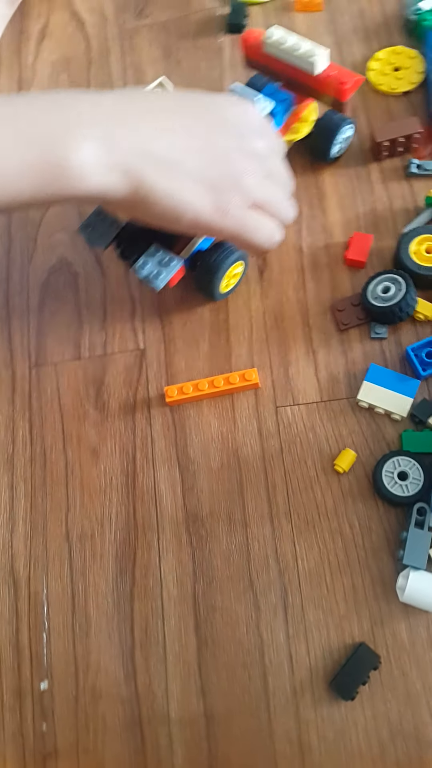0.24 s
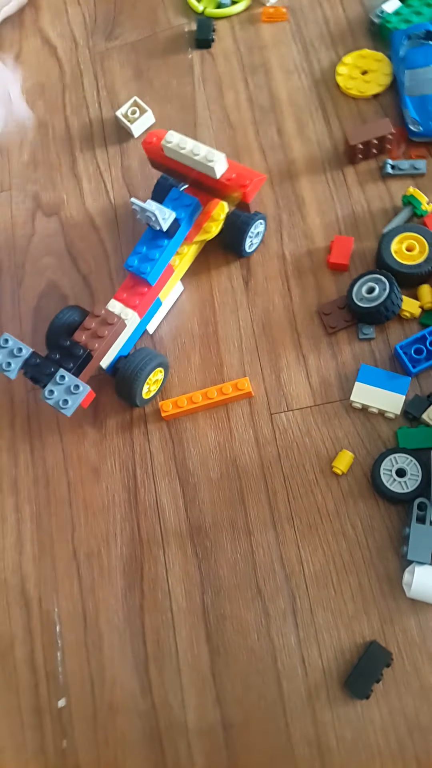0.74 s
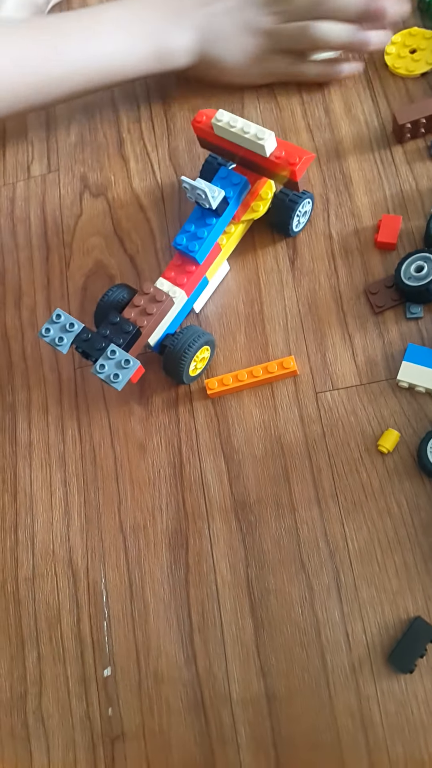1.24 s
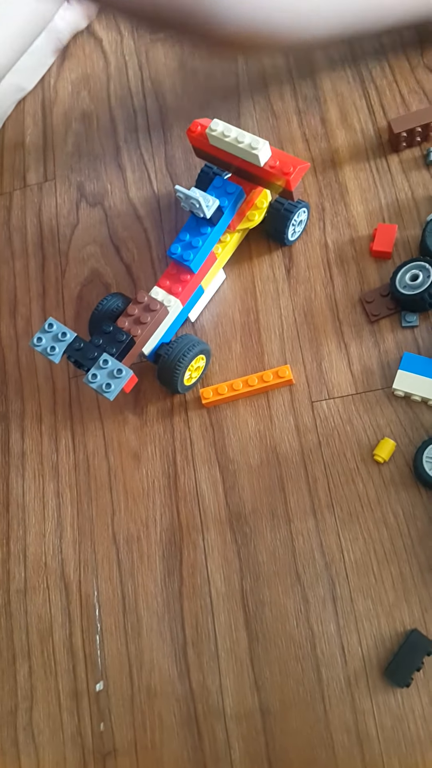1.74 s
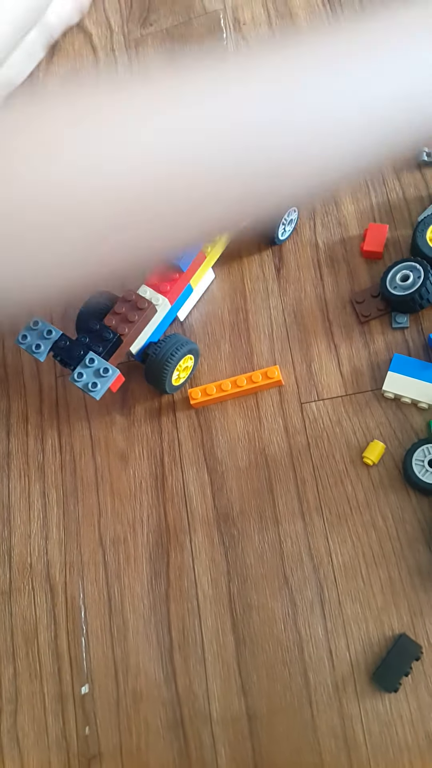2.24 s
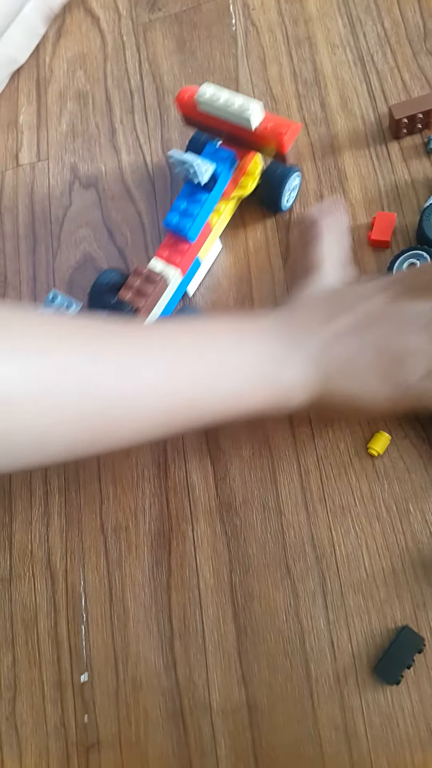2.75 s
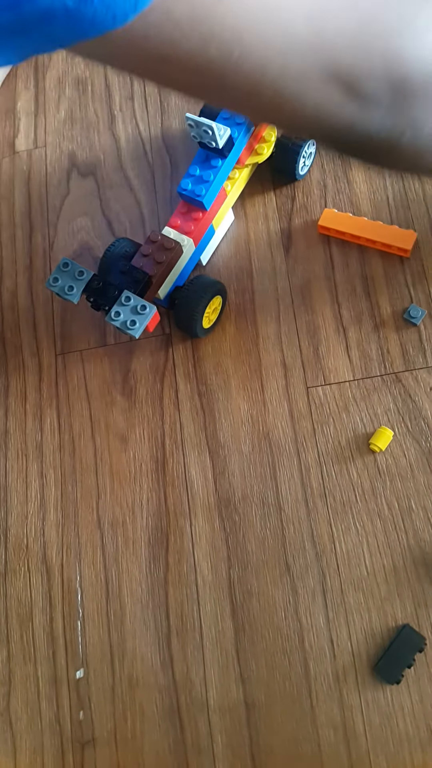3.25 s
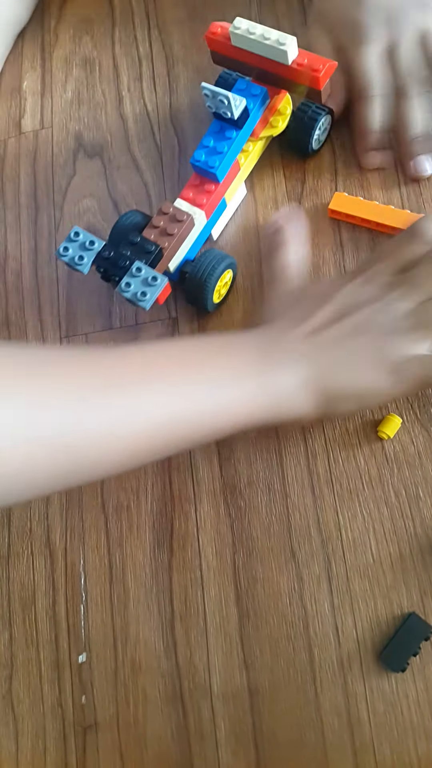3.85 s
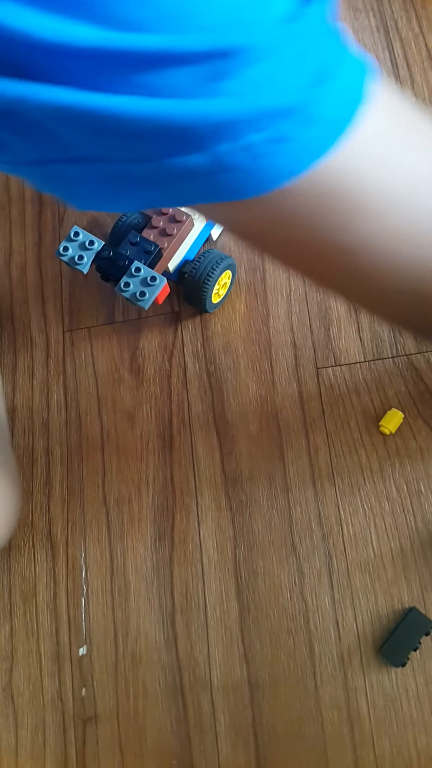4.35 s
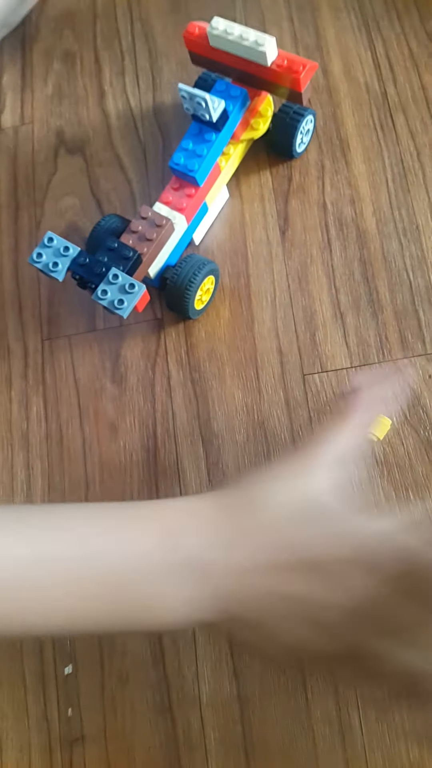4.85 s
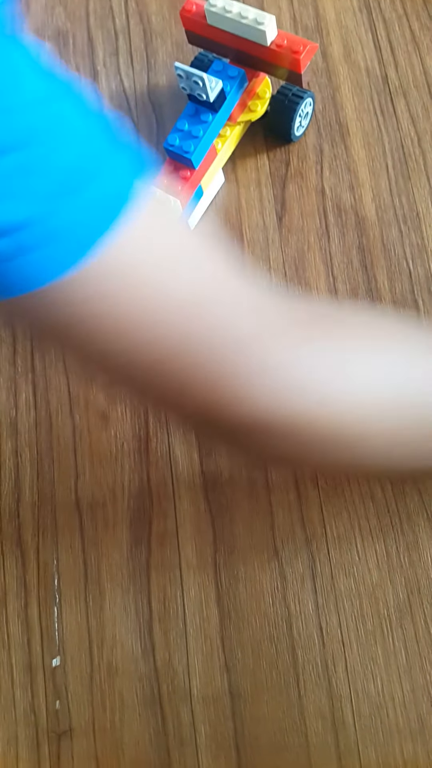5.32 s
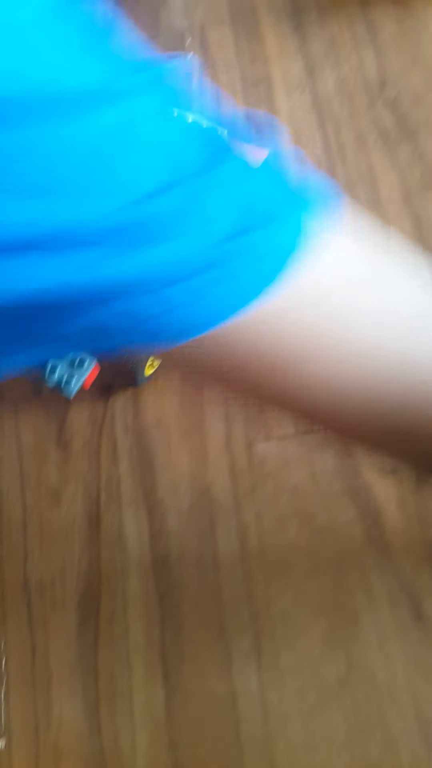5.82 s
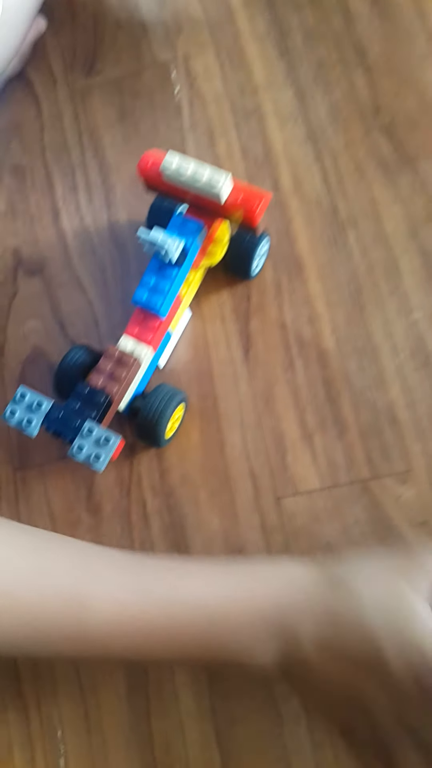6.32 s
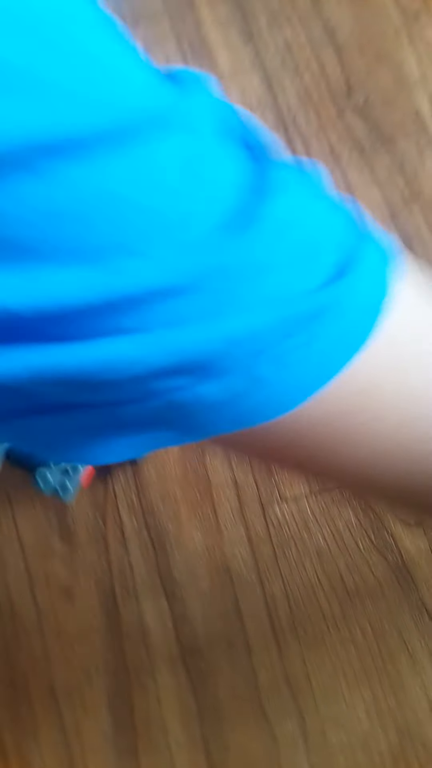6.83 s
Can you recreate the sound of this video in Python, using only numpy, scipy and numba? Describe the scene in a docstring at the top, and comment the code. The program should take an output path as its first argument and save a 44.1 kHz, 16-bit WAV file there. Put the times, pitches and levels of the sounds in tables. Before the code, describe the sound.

A hand lightly brushes loose plastic bricks and toy wheels on a wooden floor, with a few small knocks. Then it sweeps them aside five times, each a bright burst of clattering and scraping over the drumming boards. Stray clicks and softer sliding fall between the sweeps. A fan hums faintly throughout, and the microphone is close, in a small room.

```python
"""A fan motor hums throughout, close to a phone with two microphone ports. A hand first brushes loose
plastic bricks and toy wheels on a wooden floor, with a few light knocks. From 1.35 s it sweeps them along
five times: collisions excite the modes of the hollow pieces, edges skid on the varnish, the boards drum
and dragged pieces ring on. Stray knocks fall between the sweeps, and the floor gives four soft, deep
swells, as under a shifting knee. The last sweep ends near 7.1 s."""
import sys
import numpy as np
from scipy import signal
from scipy.fft import rfft, irfft, next_fast_len
from scipy.io import wavfile
from scipy.ndimage import uniform_filter1d
from numba import njit

SR = 44100
rng = np.random.default_rng(int(sys.argv[2]) if len(sys.argv) > 2 else 0)


def bounce(signal):
    """Save signal as a 16-bit WAV file at the path given by the first command-line argument."""
    frames = np.transpose(np.atleast_2d(signal))
    limited = np.clip(frames, -1, 1)
    pcm = np.round(limited * 32767).astype(np.int16)
    wavfile.write(sys.argv[1], SR, pcm)


N = 312228
PORT_LAG = 11  # samples by which the right port hears later

# normal modes of the hollow bricks: f/Hz, spread/Hz, relative level/dB
BRICK_MODES = [(2184, 300, -12.5), (3480, 640, -7.5), (4007, 396, -4), (5000, 140, -6.5), (5750, 233, -4.5),
               (6720, 340, -4), (8140, 110, -10.5), (8600, 646, -4.5), (10560, 680, -5.5),
               (10980, 1000, -10), (12380, 350, -10), (14550, 510, -14.5)]


def undb(db):
    """Amplitude ratio of a level in decibels."""
    return 10 ** (np.asarray(db) / 20)


def level(x, db):
    """Scaling to a given RMS level."""
    return x * undb(db) / np.sqrt(np.mean(x ** 2))


def colour(x, points):
    """Spectral shaping by points (f/Hz, gain/dB) joined on a log-frequency axis."""
    hz, db = np.transpose(points)
    size = next_fast_len(N)
    log_hz = np.log(np.arange(size // 2 + 1) * SR / size + 1)
    return irfft(rfft(x, size) * undb(np.interp(log_hz, np.log(hz), db)), size)[..., :N]


def two_bands(x, split_hz, low_db, high_db):
    """Crossover: complementary bands, each with its own gain."""
    low = colour(x, [(split_hz, 0), (1.2 * split_hz, -30)])
    return low * undb(low_db) + (x - low) * undb(high_db)


def resonate(x, modes):
    """Superposition of two-pole resonances (f/Hz, bandwidth/Hz, gain/dB)."""
    return sum(undb(db) * signal.lfilter(*signal.iirpeak(hz, hz / width, SR), x)
               for hz, width, db in modes)


def walk(rate_hz):
    """Slow random modulation: held values, smoothed twice, with a spread near 1."""
    hold = int(SR / rate_hz)
    steps = np.repeat(rng.standard_normal(N // hold + 1), hold)
    return 1.3 * uniform_filter1d(uniform_filter1d(steps, hold), hold)[:N]


def ports(x, other, coherent_hz):
    """Partial coherence: the right port hears x later, giving way to an unrelated sound in the treble."""
    hz = np.arange(len(x) // 2 + 1) * SR / len(x)
    coherence = 1 / (1 + (hz / coherent_hz) ** 2.7)
    right = coherence * rfft(np.roll(x, PORT_LAG)) + np.sqrt(1 - coherence ** 2) * rfft(other)
    return np.array([x, irfft(right, len(x))])


@njit
def damped_sines(size, start, hz, t60, gain, lag):
    """Free vibration: each mode decays exponentially, with its own gain and arrival at each port."""
    out = np.zeros((2, size + 8192))
    for mode in range(len(start)):
        pole = np.exp(2j * np.pi * hz[mode] / SR - np.log(1000) / (t60[mode] * SR))
        phasor = 1 + 0j
        for i in range(min(int(t60[mode] * SR), 8000)):
            phasor *= pole
            out[0, start[mode] + i] += gain[0, mode] * phasor.imag
            out[1, start[mode] + lag[mode] + i] += gain[1, mode] * phasor.imag
    return out[:, :size]


def strike(start, db, pan_db, hz, t60, lag):
    """Impulse excitation of one mode per entry; start and lag are in samples, t60 in seconds."""
    gain = undb(db + np.array([pan_db, -pan_db]) / 2)
    lag = np.clip(lag, 0, 60).astype(np.int64)
    return damped_sines(N, start.astype(np.int64), np.clip(hz, 50, .45 * SR), t60, gain, lag)


def fan_hum(fundamental_hz=67.74):
    """Harmonic series: motor partials waver together in pitch, singly in level, over rushing air."""
    # motor partials: harmonic number, level/dB, left minus right/dB
    partials = [(2, -48, -1), (3, -46.5, 4.5), (4, -52, -2), (5, -56, -7), (6, -57.5, -11)]
    # spectrum of the air: f/Hz, relative density level/dB
    air_spectrum = [(20, -35.5), (60, -22.5), (98, -12.5), (126, 0.5), (159, -5), (197, 3), (235, -4.5),
                    (275, -5.5), (420, -12), (1400, -19), (3000, -26), (5000, -34), (7500, -44.5),
                    (16000, -45.5)]
    phase = 2 * np.pi * np.cumsum(fundamental_hz * (1 + 0.01002 * walk(2.2))) / SR
    motor = sum(undb(db + 1.47 * walk(14) + np.array([[pan_db], [-pan_db]]) / 2) * np.sin(k * phase)
                for k, db, pan_db in partials)
    air = colour(ports(*rng.standard_normal((2, N)), coherent_hz=1140), air_spectrum)
    return np.array([motor[0], np.roll(motor[1], PORT_LAG)]) + level(air, -43)


def hand_levels(still_db=-83, fade_db=29.5):
    """Incoherent sources add as powers: sweeps and brushes set clatter, skid, drum, grit and top in dB."""
    # light brushes of the hand: t/s, rise/s, fall/s, clatter level/dB, sliding level/dB
    brushes = [(0.458, 0.11, 0.12, -48, -39), (.512, .03, 0.033, -47, -48), (.546, 0.14, 0.012, -56, -44),
               (1.148, 0.03, 0.027, -57, -46), (1.26, 0.25, 0.41, -63, -50.5),
               (2.19, 0.049, 0.086, -51, -41.5), (2.41, 0.077, 0.22, -55.5, -48),
               (3.95, 0.11, 0.16, -57, -47), (4.88, 0.11, 0.18, -45.5, -42.5),
               (5.09, 0.024, 0.08, -60, -43), (5.17, 0.13, 0.22, -56, -38), (5.226, 0.017, 0.018, -33, -25),
               (6.0, 0.11, 0.18, -49, -50), (6.13, 0.21, 0.41, -47, -41), (6.32, 0.2, 0.077, -76, -46),
               (6.682, 0.26, 0.18, -47.5, -45)]
    # five sweeps, one envelope each: t/s, clatter level/dB, sliding level/dB
    sweeps = [
        [(1.35, -72, -51), (1.36, -39.5, -46), (1.386, -26, -43), (1.44, -33, -40.5), (1.56, -36, -38),
         (1.62, -30, -36.5), (1.73, -29, -33.5), (1.784, -24, -33.5), (1.814, -24.5, -35), (1.98, -32, -34.5),
         (2.098, -48.5, -47.5), (2.16, -77, -44)],
        [(2.71, -61, -63), (2.728, -49, -38), (2.77, -22, -38.5), (2.872, -28.5, -33), (2.94, -27.5, -33.5),
         (2.985, -27.5, -29), (3.03, -20, -36.5), (3.075, -23.5, -28.5), (3.12, -21.5, -29.5),
         (3.165, -25, -33.5), (3.222, -24, -32), (3.468, -43.5, -41.5), (3.516, -40, -42), (3.7, -68, -64)],
        [(4.0, -63.5, -56), (4.168, -40.5, -29), (4.2, -27.5, -36.5), (4.21, -38, -37), (4.245, -29.5, -32.5),
         (4.27, -26, -31), (4.33, -23.5, -36), (4.36, -23.5, -32.5), (4.39, -26.5, -33.5), (4.44, -29.5, -32.5),
         (4.59, -36.5, -35.5), (4.758, -61, -56), (4.77, -52, -50)],
        [(5.238, -38, -34), (5.294, -46, -35), (5.346, -28, -32), (5.37, -35, -32.5), (5.524, -46.5, -36.5),
         (5.534, -43, -39.5), (5.67, -31, -33.5), (5.734, -40, -36.5), (5.91, -73, -63.5)],
        [(6.699, -55, -41), (6.705, -33, -39), (6.72, -33, -47), (6.727, -36, -40), (6.745, -27, -40),
         (6.754, -22, -36), (6.76, -21.5, -33), (6.8, -17.5, -33.5), (6.828, -22, -27), (6.84, -23, -29.5),
         (6.894, -29.5, -35), (6.98, -27, -30), (7.074, -42, -40), (7.08, -42, -49)],
    ]
    # offsets for each sweep's heap: skid/dB, drumming/dB, grit over skid/dB, top of the clatter/dB
    heaps = [(-2.5, 2, 3.5, -3), (0.6, 2, -1.9, -0.5), (1.8, -1, -0.9, -2), (3.5, -0.5, -8.5, -0.5),
             (0, 0.5, -4, 0.5)]
    t = np.arange(N) / SR
    power = np.full((5, N), undb(2 * still_db))
    for sweep, (skid_db, drum_db, grit_db, top_db) in zip(sweeps, heaps):
        times, clatter_db, slide_db = np.transpose(sweep)
        rows = (clatter_db, slide_db + skid_db, slide_db + drum_db,
                slide_db + skid_db + grit_db, clatter_db + top_db)
        power += undb([2 * np.interp(t, times, row, left=-200, right=-200) for row in rows])
    for peak_s, rise, fall, clatter_db, slide_db in brushes:
        away = np.maximum((peak_s - t) / rise, (t - peak_s) / fall)
        rows = np.array([[clatter_db], [slide_db], [slide_db], [slide_db], [clatter_db]])
        power += undb(2 * (rows - fade_db * np.minimum(away, 10)))
    return 10 * np.log10(power)


def clatter(body_db, top_db, collisions=26000, modes_each=3):
    """Modal ringing: thousands of small collisions, in louder and softer bunches, excite brick modes."""
    when, force = np.repeat(rng.random((collisions, 2)), modes_each, axis=0).T
    pan, lag = np.repeat(rng.standard_normal((collisions, 2)), modes_each, axis=0).T
    mode, sustain, detune, soft = rng.random((collisions * modes_each, 4)).T
    hz, spread, mode_db = np.array(BRICK_MODES)[(mode * len(BRICK_MODES)).astype(int)].T
    start = (when * N).astype(int)
    force_db = 2 * np.minimum(-np.log(1 - force), 4)  # most collisions are soft
    bunch_db = walk(65)[start]
    db = mode_db + force_db + bunch_db - 5.1 * soft
    hz = hz + 1.506 * spread * (2 * detune - 1)
    t60 = 0.0093 * 3.04 ** (2 * sustain - 1)
    ringing = level(strike(start, db, 4.5 * pan, hz, t60, PORT_LAG + 8 * lag), 0)
    return two_bands(ringing, split_hz=9000, low_db=body_db, high_db=top_db)


def slips(density, spread_db):
    """Shot noise of friction: sparse impulses of uneven size."""
    impulses = (rng.random(N) < density) * rng.standard_normal(N)
    return impulses * undb(spread_db * np.minimum(rng.exponential(size=N), 4))


def skid(rub_db, grit_db):
    """Sliding friction: edges slip over the grain of the varnish, a hollow rub below and grit above."""
    # spectrum of the friction: f/Hz, relative density level/dB
    spectrum = [(410, 5.5), (700, 6.5), (1330, 11.5), (1460, 11.5), (3500, 5), (6740, -16), (7490, -45),
                (8420, -33), (11400, -13), (16000, -19)]
    patchy = undb(2.73 * walk(45))
    friction = ports(slips(.3, 0.99) * patchy, slips(.3, 3.7) * patchy, coherent_hz=2310)
    friction = level(colour(friction, spectrum), 0)
    return two_bands(friction, split_hz=2050, low_db=rub_db, high_db=grit_db)


def boards(drum_db):
    """Forced vibration: the sliding pieces drive the resonances of the floor."""
    # modes of the boards: f/Hz, bandwidth/Hz, relative gain/dB
    modes = [(254, 57, 14), (302, 70, 16.5), (370, 84, 12.5), (419, 46, -2), (670, 350, 9.5),
             (744, 88, 3.5), (1230, 120, -3)]
    patchy = undb(walk(30))
    force = ports(patchy * slips(.2, 0.94), patchy * slips(0.16, 0.79), coherent_hz=1190)
    return level(resonate(force, modes), 0) * undb(drum_db)


def knocks(parts=24):
    """Impact transients: a crack, a woody tap, a hand-damped thud, the piece's ring and a short rattle."""
    # single knocks: t/s, level/dB, ring f/Hz, weight on the boards relative to that level/dB
    blows = [(.4501, -40, 2500, -10), (0.51, -37, 2300, -4), (1.147, -39, 2400, 4),
             (1.3607, -23.5, 3300, -9), (1.3858, -17, 6700, -29), (1.378, -18.5, 4050, -19),
             (1.401, -13.5, 4860, -12), (1.475, -17, 3860, -14), (1.511, -17, 3360, -12),
             (1.55, -20, 6960, -12), (1.568, -12, 4450, -13), (1.6086, -21, 4400, -7),
             (1.632, -29, 12900, -17), (1.6631, -20, 10800, -18), (1.688, -15, 11100, -14),
             (1.735, -24, 3300, -10), (1.7443, -15.5, 9390, -25), (1.761, -14.5, 3900, -13),
             (1.805, -16, 4520, -22), (1.8556, -25, 11600, -20), (1.929, -33, 12500, -28),
             (1.946, -22, 8600, -31), (1.974, -25, 11000, -22), (1.983, -25.5, 11100, -34),
             (1.991, -16.5, 8740, -24), (2.0428, -28.5, 10300, -25), (2.184, -32, 8600, -13),
             (2.195, -38, 6900, -20), (2.198, -43, 12000, -26), (2.273, -40, 2910, 13.5),
             (2.379, -21.5, 2470, 3), (2.3865, -32, 6500, -12), (2.4285, -42, 3660, 14),
             (2.5016, -33, 3620, 9.5), (2.7257, -22, 5730, -28), (2.735, -23, 3400, -16),
             (2.743, -19.5, 5600, -24), (2.7628, -13, 5770, -10), (2.77, -17.5, 6250, -23),
             (2.771, -19.5, 13200, -33), (2.79, -18, 5000, -24), (2.8094, -14.5, 6500, -20),
             (2.833, -16.5, 6330, -16), (2.848, -11.5, 10700, -8), (2.894, -14, 5700, -22),
             (2.957, -9.5, 9200, -22), (2.957, -19, 13000, -28), (2.9892, -9.5, 5100, -20),
             (2.991, -17, 12000, -26), (3.012, -16, 10300, -30), (3.018, -17, 6640, -28),
             (3.023, -14, 8800, -32), (3.025, -5.5, 6070, -24), (2.997, -12.5, 6560, -22),
             (3.039, -10, 6800, -18), (3.085, -13, 8700, -27), (3.099, -17, 4600, -20),
             (3.107, -20.5, 8600, -30), (3.123, -17.5, 11500, -26), (3.1743, -11.5, 4520, -29),
             (3.347, -34, 3750, -17), (3.374, -26.5, 11200, -34), (3.3755, -18.5, 4930, -14),
             (3.4247, -23.5, 11700, -18), (3.458, -36, 2400, 11), (3.481, -37.5, 2400, 18.5),
             (3.502, -23, 5000, -25), (3.509, -25, 5600, -29), (3.509, -31, 12000, -30),
             (3.516, -18.5, 5270, -19), (3.5496, -22, 2390, -2), (3.568, -38, 2400, 11),
             (3.577, -31.5, 6700, -17), (3.905, -21, 5560, -7), (3.975, -39, 3900, 14.5),
             (4.0966, -29.5, 3700, -21), (4.137, -25, 2350, -15), (4.159, -19, 3650, -10),
             (4.1892, -13, 8530, -20), (4.199, -16, 6500, -16), (4.236, -21, 5050, -20),
             (4.2506, -10, 7500, -14), (4.254, -13, 8600, -21), (4.297, -14.5, 5950, -10),
             (4.309, -19, 6960, -20), (4.324, -15.5, 8650, -20), (4.337, -13, 8400, -23),
             (4.342, -6, 6200, -25.5), (4.3697, -10, 6530, -20), (4.423, -15, 5580, -26),
             (4.565, -26, 8600, -30), (4.5828, -19, 5700, -26), (4.674, -37, 3300, -30),
             (4.688, -34, 8500, -20), (4.7718, -28, 5800, -19), (4.806, -41, 8600, -26),
             (4.8232, -29.5, 3660, -7), (4.844, -27, 2860, -1), (4.8435, -40, 12300, -28),
             (4.869, -31, 6500, -16), (4.875, -30, 7900, -20), (4.884, -29.5, 5600, -31),
             (4.894, -42, 13000, -30), (5.0111, -40.5, 2490, 12.5), (5.064, -34, 2500, 11),
             (5.0862, -33, 2570, 3), (5.1594, -24.5, 3030, -11), (5.172, -27, 6400, -22),
             (5.211, -22, 5960, -20), (5.2237, -9, 6000, -18), (5.2294, -11, 6100, -20),
             (5.272, -19.5, 3100, -4), (5.308, -25, 3160, -10), (5.3219, -11, 9560, -24),
             (5.3225, -20, 12600, -25), (5.3408, -13, 12400, -21), (5.4068, -15, 10400, -16),
             (5.4649, -22.5, 8500, -7), (5.535, -22, 6000, -10), (5.5656, -17.5, 11800, -19),
             (5.604, -22.5, 2380, -9), (5.688, -20, 5600, -15), (5.7165, -16.5, 5900, -22),
             (5.7908, -30, 3570, 0), (5.8893, -41, 2470, 14), (6.1135, -23, 3330, -8),
             (6.128, -22.5, 3200, -19), (6.178, -34, 1910, 0), (6.2144, -36.5, 2000, 8),
             (6.262, -38, 2000, 7), (6.2844, -43, 2590, 4), (6.308, -39, 2640, -13),
             (6.316, -44, 3000, -14), (6.548, -43.5, 2400, 23.5), (6.703, -16.5, 12000, -23),
             (6.715, -18, 7400, -33), (6.7175, -15, 12000, -22), (6.7339, -13.5, 7300, -26),
             (6.7398, -9.5, 11800, -29), (6.758, -11, 3530, -22), (6.761, -16, 5430, -26),
             (6.7758, -11.5, 3630, -18), (6.808, -12.5, 7800, -18), (6.822, -10.5, 5750, -18),
             (6.92, -18.5, 5870, -30), (6.921, -25, 8300, -30), (6.934, -18, 12300, -9),
             (6.976, -16, 5800, -19), (6.987, -19, 3850, -14), (7.045, -20.5, 5750, -29),
             (7.068, -33, 8500, -28)]
    onset_s, db, piece_hz, weight_db = np.repeat(np.transpose(blows), parts, axis=1)
    pan_db = 2 * np.repeat(rng.standard_normal(len(blows)), parts)
    late, soft, scatter = rng.random((len(onset_s), 3)).T
    part = np.arange(len(onset_s)) % parts
    kinds = [part == 0, part < 4, part == 4, part < 8]  # crack, three tap modes, thud, ring; else rattle

    brick_hz, spread, brick_db = np.array(BRICK_MODES)[part % len(BRICK_MODES)].T
    tap_hz = 523 * 2 ** (2.28 * (part % 4 - soft) / 3)  # the modes span 2.28 octaves
    ring_hz = piece_hz * (1 + 0.065 * (soft - .5))
    rattle_hz = brick_hz + spread * (2 * scatter - 1)
    hz = np.select(kinds, [6000., tap_hz, 270., ring_hz], rattle_hz)
    t60 = np.select(kinds, [0.000062, 0.01, 0.029, 0.014], .004)

    thud_db = weight_db - 1.5
    tap_db = thud_db - 0.46 * np.maximum(weight_db, 0)  # heavy knocks are dull
    ring_db = -17.5 - 0.51 * weight_db
    rattle_db = brick_db - 2.5 - 2.5 * soft - 0.27 * np.maximum(weight_db + 4, 0)
    part_db = np.select(kinds, [1.5, tap_db, thud_db, ring_db], rattle_db)

    delayed = part >= 6  # the rattle and two further strikes of the ring
    rattle_s = .008 * 2 ** ((db + 10) / 14)  # half as long for a knock 14 dB softer
    late = late * np.where(kinds[3], .6, 1)  # the ring is struck again early in the rattle
    start = (onset_s + rattle_s * late ** 1.4 * delayed) * SR
    return strike(start, db + part_db, pan_db, hz, t60, PORT_LAG + 11 * (scatter - .5) * delayed)


def drags(jolts=40, ring_cycles=113):
    """Repeated excitation: a dragged piece is jolted again and again, so that one mode sounds on."""
    # hollow notes of dragged pieces: start t/s, end t/s, f/Hz, level/dB
    notes = [(1.362, 1.447, 3360, -39), (1.629, 1.662, 3430, -30.5), (1.698, 1.745, 3480, -30),
             (1.551, 1.638, 8700, -42), (1.942, 2.055, 8600, -50), (3.102, 3.134, 4800, -28),
             (5.458, 5.602, 2050, -51), (5.34, 5.468, 1330, -39), (5.603, 5.718, 1320, -38),
             (2.728, 2.755, 5520, -27.5), (2.736, 2.762, 3320, -26.5), (2.894, 2.933, 6330, -32),
             (3.493, 3.597, 5500, -47), (3.55, 3.62, 6600, -54), (4.198, 4.205, 8630, -28),
             (4.342, 4.456, 817, -28.5), (4.419, 4.566, 800, -32), (4.57, 4.637, 11000, -53),
             (4.572, 4.625, 8600, -56), (4.879, 4.908, 5760, -45), (5.36, 5.39, 6400, -40),
             (5.583, 5.699, 6720, -37), (6.701, 6.719, 5330, -24), (6.704, 6.72, 11640, -25),
             (6.709, 6.741, 7400, -33), (6.73, 6.754, 5120, -30), (6.761, 6.818, 3280, -27),
             (6.831, 6.866, 3410, -30.5), (6.808, 6.832, 5660, -26), (7.047, 7.05, 5750, -24.5)]
    start_s, end_s, hz, db = np.repeat(np.transpose(notes), jolts, axis=1)
    when, detune, soft, far = rng.random((len(hz), 4)).T
    length_s = end_s - start_s
    start = (start_s + when * length_s) * SR
    jolt_db = db + 10 * np.log10(length_s * hz / ring_cycles) - 9.6 * soft  # louder where fewer overlap
    jolt_hz = hz * (1 + 0.04 * (detune - .5))
    t60 = np.clip(ring_cycles / hz, .008, .03)
    return strike(start, jolt_db, np.zeros_like(hz), jolt_hz, t60, PORT_LAG + 7.6 * (far - .5))


def floor_swells(centre_hz=88, width_hz=24, half_length_s=0.067):
    """Narrow-band noise: a deep resonance of the floor swells under bell-shaped envelopes."""
    # soft swells of the floor: t/s, level/dB
    swells = [(1.77, -50), (2.9, -54), (3.72, -52), (5.35, -50)]
    t = np.arange(N) / SR
    mode = [(centre_hz, width_hz, 0)]
    rumble = level(resonate(resonate(rng.standard_normal(N), mode), mode), 0)
    return rumble * sum(undb(db) * np.exp(-((t - peak_s) / half_length_s) ** 2) for peak_s, db in swells)


def room(x, t60=.22, tail_db=-13):
    """Reverberation: a short diffuse tail follows the direct sound, coherent only in the bass."""
    bass_cut = signal.butter(4, 105, "high", fs=SR, output="sos")  # the pieces and boards carry no deep bass
    direct = signal.sosfilt(bass_cut, x)
    t = np.arange(SR // 2) / SR
    tail = ports(*rng.standard_normal((2, len(t))), coherent_hz=1020) * np.exp(-np.log(1000) * t / t60)
    tail = signal.lfilter([1], [1, -.4], tail)  # softens the treble
    tail /= np.sqrt(np.sum(tail ** 2, axis=1, keepdims=True))
    diffuse = signal.fftconvolve(np.mean(direct, axis=0, keepdims=True), tail, axes=1)[:, :N]
    return direct + undb(tail_db) * diffuse


def scene():
    """Superposition: the pieces and boards reverberate; the fan and the swells add directly."""
    clatter_db, skid_db, drum_db, grit_db, top_db = hand_levels()
    pieces = clatter(clatter_db, top_db) + skid(skid_db, grit_db) + knocks() + drags() + boards(drum_db)
    return room(pieces) + fan_hum() + floor_swells()


def record(dry, hiss_db=-72.5, top_hz=15900):
    """Frequency response: the two ports colour the sound differently; the phone adds hiss, cuts the top."""
    # response of the left port: f/Hz, left minus right/dB
    left_response = [(160, -0.9), (270, -2), (500, 2), (1100, 1), (2200, 3.5), (4000, -0.65), (8000, -0.9),
                     (15000, -1)]
    left = colour(dry[0], [(100, -.4)] + left_response)  # the ports nearly agree in the deep bass
    heard = np.array([left, dry[1]]) + undb(hiss_db) * rng.standard_normal((2, N))
    return signal.sosfilt(signal.ellip(10, .2, 80, top_hz, fs=SR, output="sos"), heard)


dry = scene()
out = record(dry)
bounce(out)
```